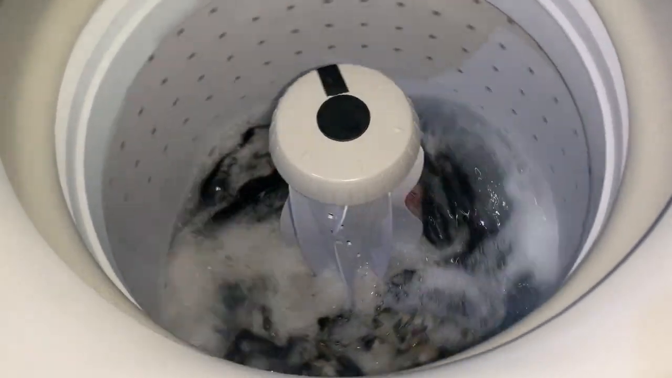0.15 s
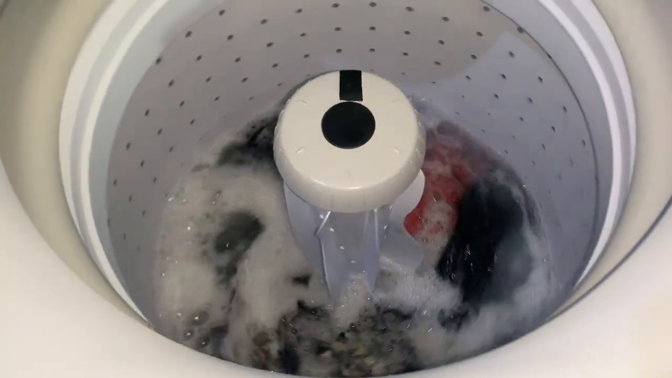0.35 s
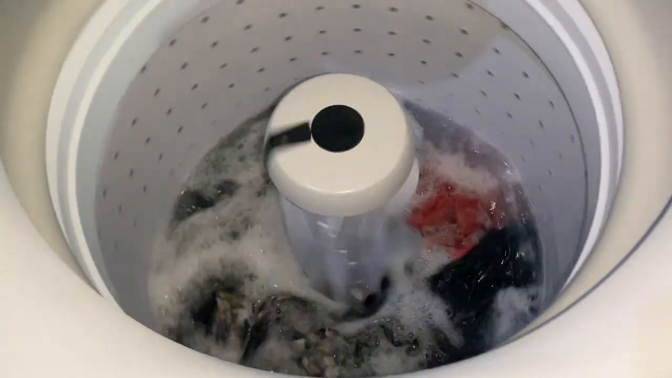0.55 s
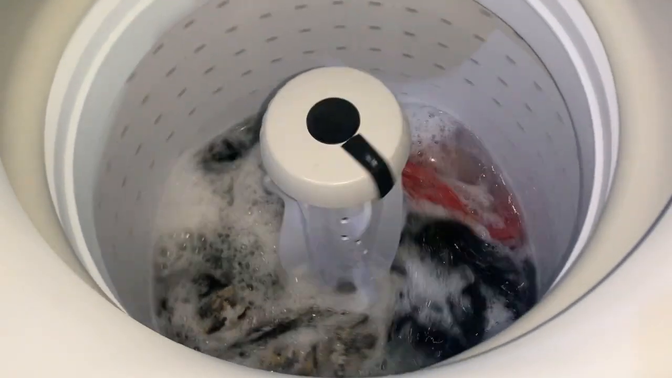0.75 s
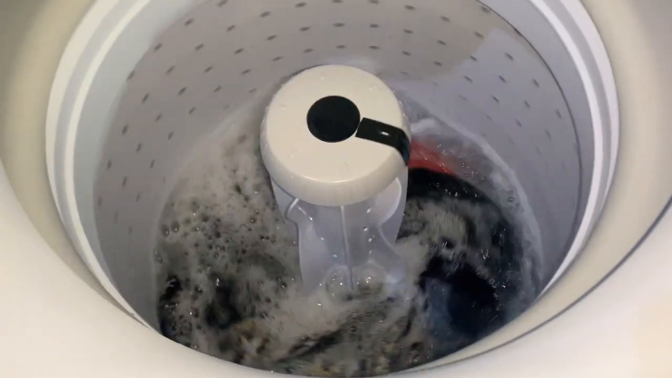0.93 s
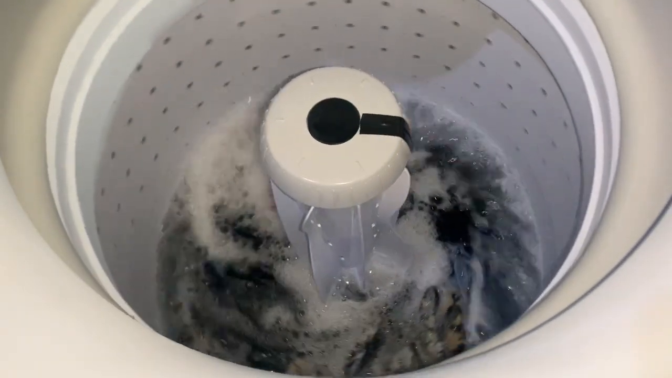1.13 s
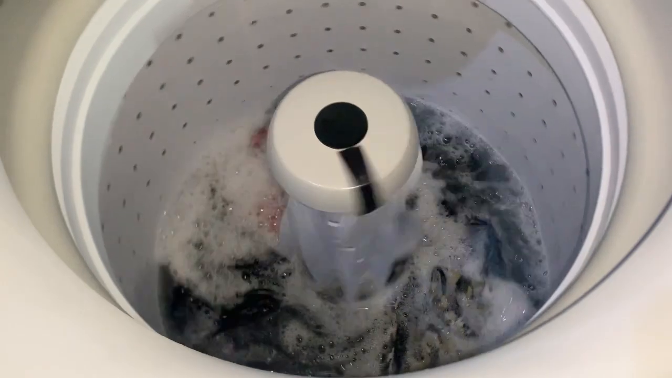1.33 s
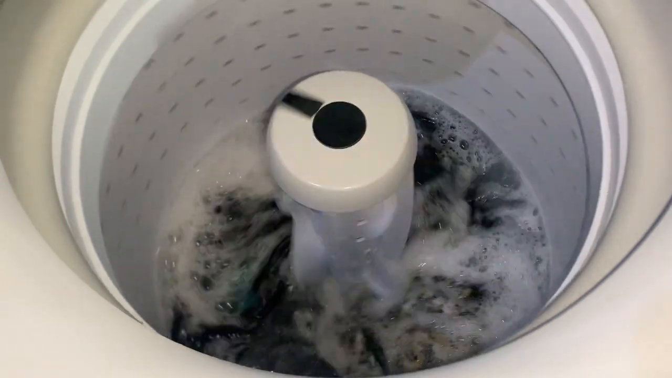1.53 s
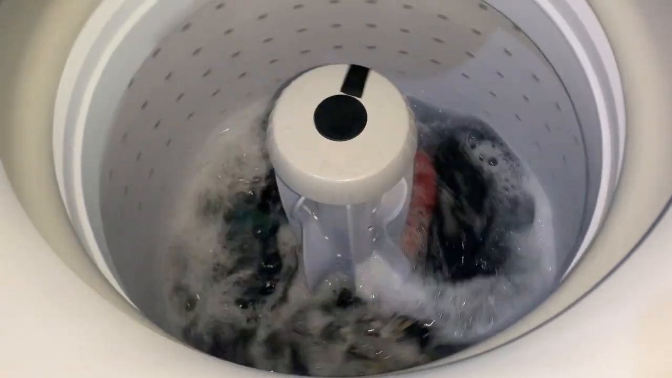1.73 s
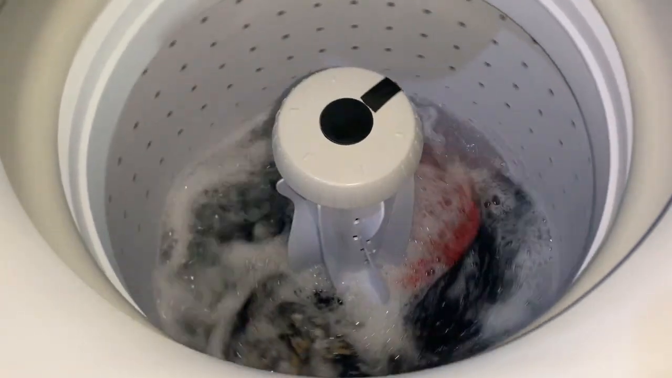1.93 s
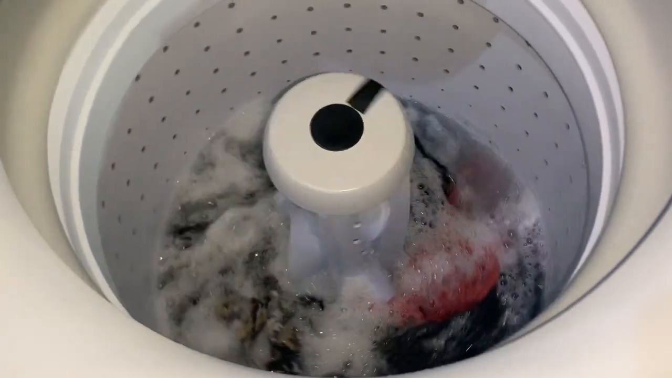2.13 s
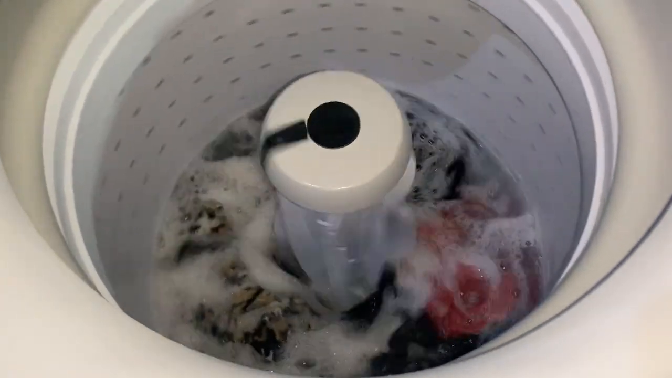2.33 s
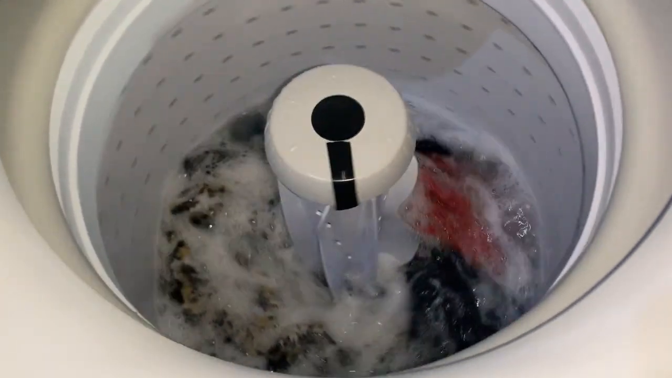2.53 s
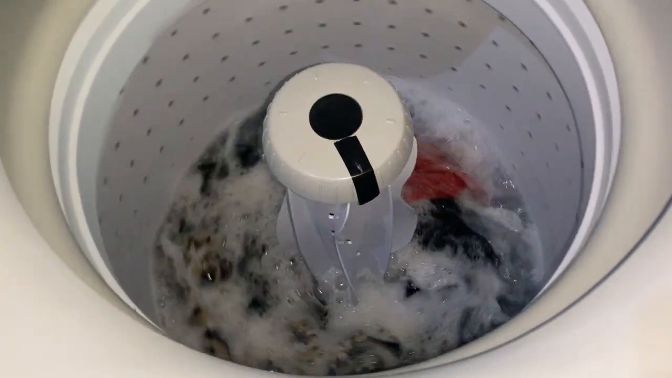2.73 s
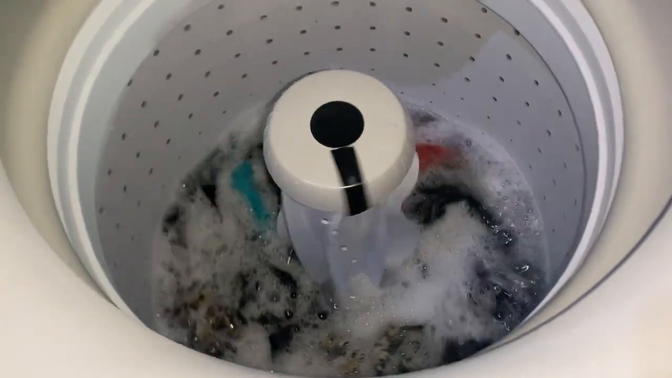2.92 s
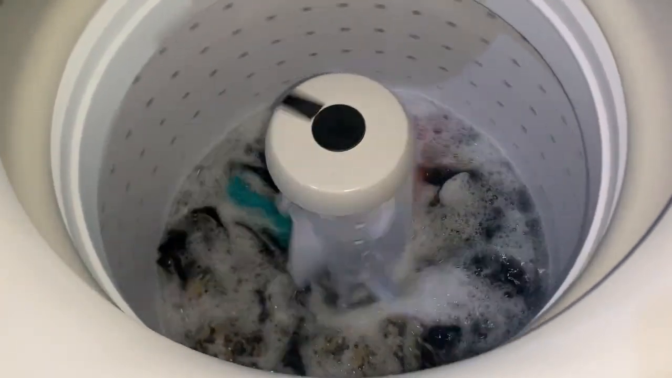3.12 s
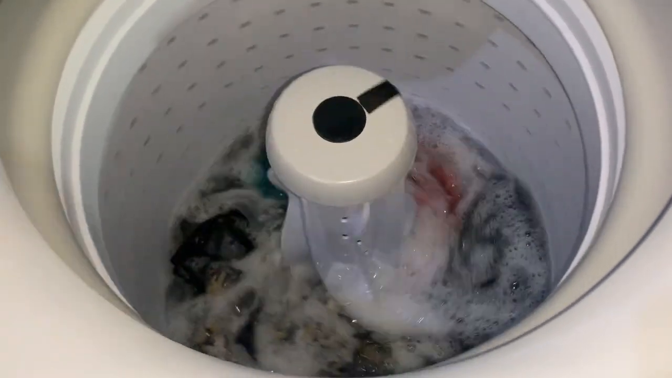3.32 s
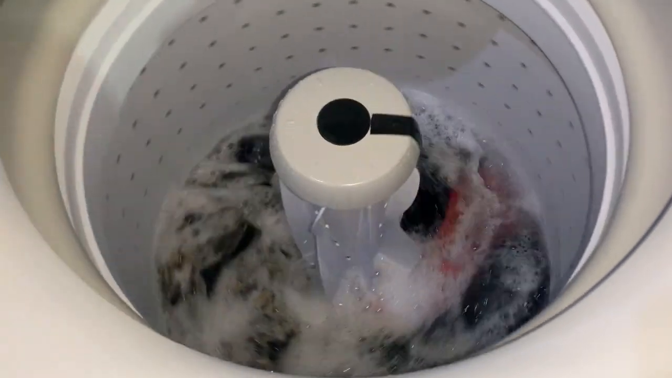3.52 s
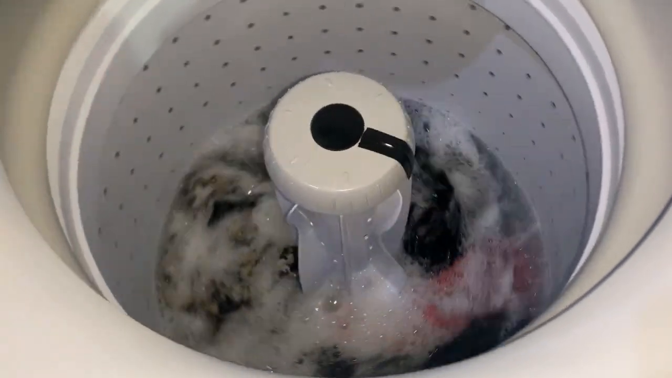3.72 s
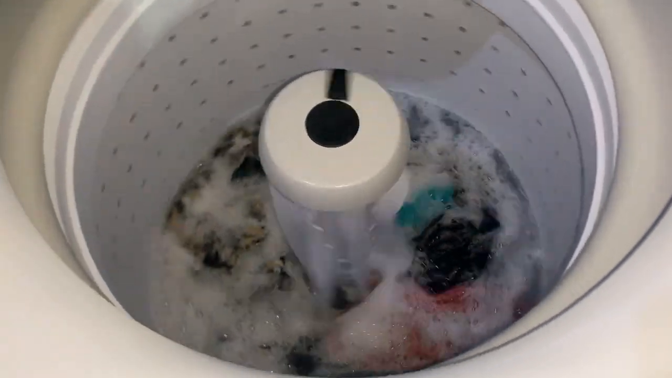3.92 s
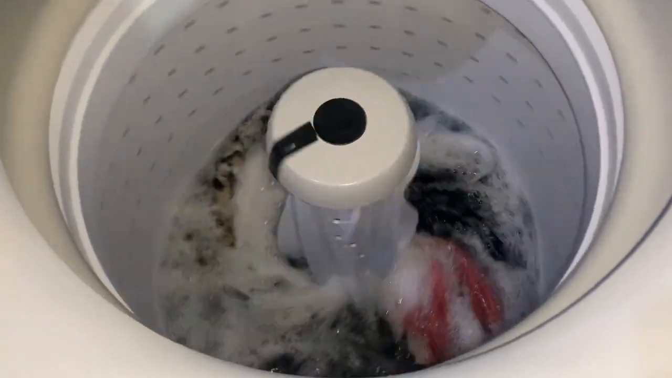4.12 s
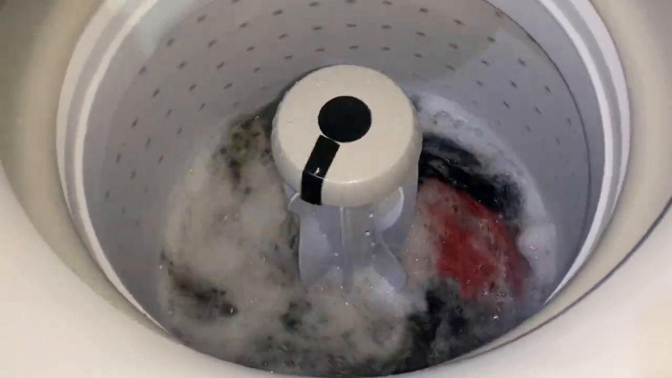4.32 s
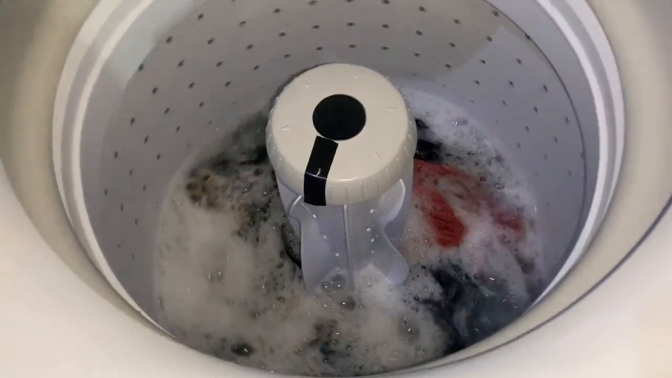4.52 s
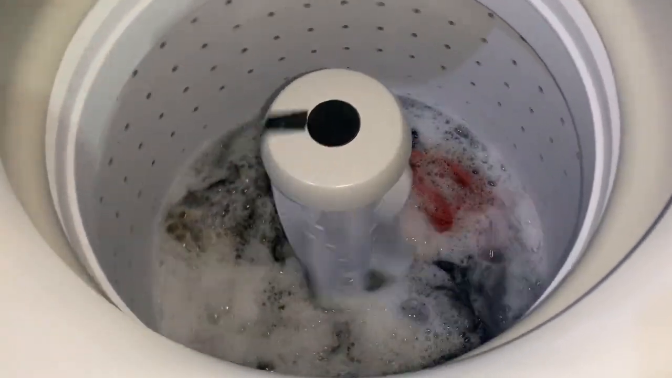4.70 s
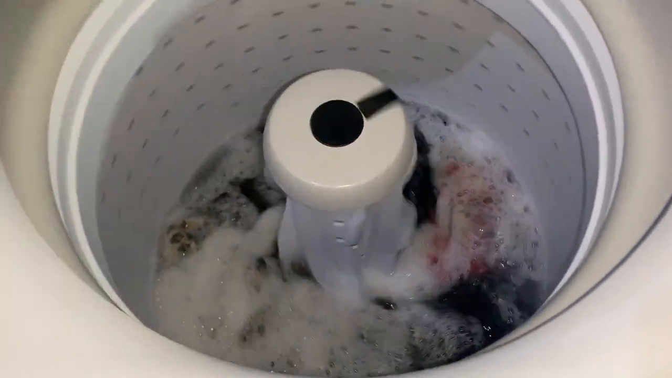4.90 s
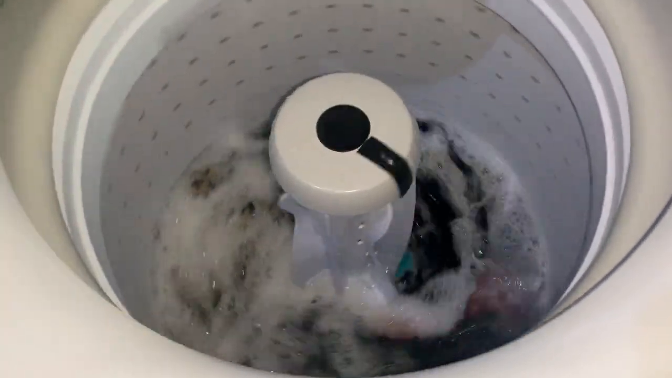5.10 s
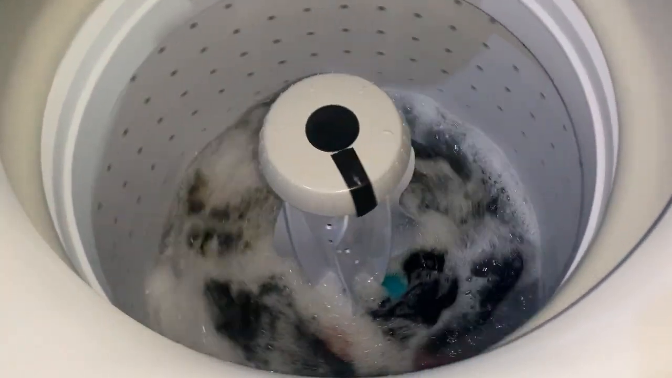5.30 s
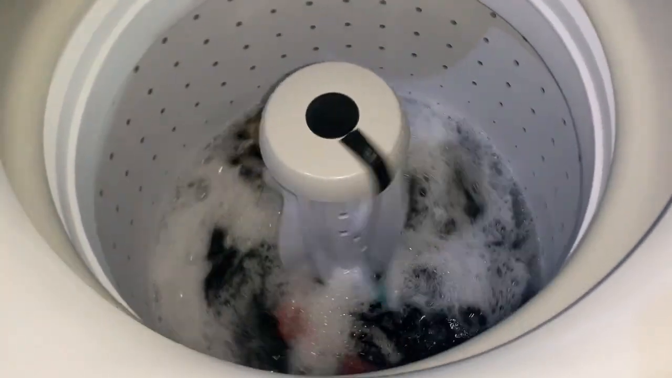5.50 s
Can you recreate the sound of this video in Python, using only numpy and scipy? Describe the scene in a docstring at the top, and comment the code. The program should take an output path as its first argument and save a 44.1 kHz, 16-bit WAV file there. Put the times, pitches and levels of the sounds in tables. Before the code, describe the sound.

Short, throbbing electric hums alternate with sloshing pauses as wet laundry thuds round an open washer tub and suds fizz and gulp.

```python
"""A top-loading washer heard from above its open tub. The motor is switched on for each stroke, turn and turn about:
it buzzes at multiples of twice the mains, throbs with its shaft and shakes the cabinet. Heavy water thuds round the
tub, suds hiss, splashes spit and bubbles gulp; two microphone ports hear the treble one after the other."""
import sys
import numpy as np
from scipy import signal
from scipy.fft import rfft, irfft
from scipy.io import wavfile
from scipy.ndimage import uniform_filter1d

SR = 44100
rng = np.random.default_rng(int(sys.argv[2]) if len(sys.argv) > 2 else 0)


def materialize(psi):
    """Save the field psi as 16-bit PCM at rate SR to the path in sys.argv[1].

    A 1-D psi becomes a single channel; in a 2-D psi each row is a channel.
    """
    bounded = np.clip(np.atleast_2d(psi).T, -1, 1)
    quanta = np.round(bounded * 32767).astype(np.int16)
    wavfile.write(sys.argv[1], SR, quanta)


N = 244755

# motor under current: (on s, off s, cabinet dB, third multiple dB, fourth multiple dB, second multiple in the run-up dB, it joins after s, its dB, cabinet fades after switch-off dB per s,
# sags by dB, upper panels dB, growl dB above the cabinet)
STROKES = [(-0.47, -0.032, -42.5, -22, -31, -45, .17, -33, 105, 2.5, 0, 0), (0.371, 0.786, -32, -41, -36, -44, 0.16, -35.5, 112, -6.5, 2, 0.5), (1.186, 1.629, -30.5, -45.5, -33.5, -46.5, 0.14, -28.5, 90, -5, -1, 4),
           (2.052, 2.42, -32, -40, -36.5, -41.5, 0.16, -36.5, 85, -4.5, 1, -3), (2.865, 3.28, -30.5, -42.5, -31.5, -48, 0.17, -27, 108, -7.5, 0.5, 2.5), (3.735, 4.12, -32, -39.5, -38.5, -40, 0.193, -37, 106, -3, 0.5, -2.5),
           (4.551, 4.951, -30, -46.5, -36, -48, 0.16, -32.5, 110, -3.5, 1, -0.5), (5.413, 5.80, -32, -41, -30.5, -57, 0.033, -39, 100, -4, 1, 3)]
TWICE_MAINS_HZ = 119.9  # fixed
# other multiples of the buzz, turning one way and the other: (multiple of twice the mains, dB above the cabinet at switch-on, swollen, midway, at switch-off)
WINDING = [[(1, -4, -5.5, -7.5, 1), (5, -5.5, -11, -3, -7.5), (6, -5, -13.5, -5.5, -11)], [(1, 1, 0, -1.5, 1), (5, -15.5, -10, -19.5, -16), (6, -10.5, -8.5, -8.5, -4)]]
CABINET = [(150, -5.5), (250, 2), (285, -8), (355, 0.5), (424, -16), (473, -2.5), (548, -0.5), (583, -3), (697, -6),
           (771, -8.5), (1170, -22.5), (1280, -75.5), (1600, -30), (2080, -64), (3520, -120)]  # (Hz, dB)
CABINET_ALIKE = 0.67
TUB = [(86, 120, -38.5), (111, 6.6, 1.5), (143.8, 27, -3), (200, 250, -7.5)]  # (Hz, width Hz, dB)
WASH = [(900, 8), (1400, -2), (2000, 1), (3000, -4), (4000, -8), (5500, -12), (7500, -22.5)]  # (Hz, dB)
WASH_RIGHT_DB = [(1000, -1.5), (2500, -0.5), (4400, 0), (5800, 4.5), (7000, 5)]  # (Hz, right over left dB)
SPRAY = [[(5000, -19), (6500, 7), (8000, 3.5), (9500, -2)], [(9500, 3.5), (11000, 1), (14000, 2), (16000, 1)]]  # low and high: (Hz, dB)
# splashes: (s, peak dB, wash band dB above it, top octave dB above it, t60 s)
SPLASHES = [(0.1526, -55, 4, -6, 0.061), (0.17, -37, -16, -2.5, 0.032), (0.3007, -60, -10, -9, 0.04),
            (0.709, -31, 11, -13, 0.052), (0.784, -39, 6, -5, 0.025), (0.9108, -31.5, -15, -13, 0.018),
            (0.956, -45, -13, -11, 0.16), (1.1258, -53, -4, -28, 0.41), (1.3887, -51, -8, -20, 0.052),
            (1.428, -40.5, 9, -8, 0.062), (1.4915, -35, 6, -29, 0.034), (1.567, -44, 3, -13, 0.12),
            (1.7478, -27, -6, -16, 0.049), (1.762, -45, -5, -11, 0.09), (1.8602, -47, -14.5, -2, 0.04), (1.8821, -50.5, 9, -1, 0.021),
            (1.9205, -45, -23, -3, 0.13), (2.2807, -33, -2, -8, 0.019), (2.3075, -37, 2, -9, 0.065),
            (2.3416, -31, -16, -5, 0.025), (2.3905, -38, -13, -16, 0.049), (2.4124, -35, -16, -11, 0.067),
            (2.5085, -50, 14, -26, 0.068), (2.5306, -46, 8, -6, 0.044), (2.582, -47, -19, 5, 0.02),
            (3.008, -41.5, -3, -35, 0.057), (3.0505, -39, 9, -25, 0.024), (3.0679, -48, -9, 1, 0.031),
            (3.138, -42, -13, -1, 0.027), (3.1782, -50, 4, -12, 0.076), (3.263, -32, -12, -4, 0.019),
            (3.463, -36, -4, -20, 0.05), (3.932, -44.5, 12, -2, 0.13), (3.9785, -36, -16, -1, 0.047),
            (4.008, -32.5, 1, 1, 0.026), (4.048, -32, -13, -9, 0.025), (4.1004, -46, 1, 1, 0.037),
            (4.15, -33, -20, -6, 0.018), (4.1944, -51, 15, -31, 0.034), (4.2303, -46, 12, -12, 0.04),
            (4.2398, -38.5, 5.5, -13, 0.11), (4.781, -50, -4, -21, 0.16), (4.891, -32.5, -16, -9, 0.026),
            (4.935, -47.5, 1, -6, 0.14), (5.03, -55, 0, -4, 0.025), (5.0524, -45, 2, -22, 0.027),
            (5.1192, -42.5, -2, -4.5, 0.066), (5.1971, -48, -6.5, -21, 0.029), (5.219, -55, -6, -6, 0.035),
            (5.259, -35.5, -10, -21, 0.047), (5.3148, -59.5, 11, -8, 0.18)]
RUMBLE_DB = -63
TOP_HZ = 15900  # fixed
T = np.arange(N) / SR
SIDES = np.array([[1], [-1]])
# the rotor growls until it is up to speed: (multiple of twice the mains, dB)
GROWL = [(3.5, -7.5), (4.5, -10.5), (5.5, -10), (6.5, -12), (7.5, -11.5), (8.5, -19.5), (9.5, -27)]
RUN_UP_S, SHAFT_HZ = 0.1015, 26.96
PANELS = [(450, 40, 7), (513, 65, -6), (683, 65, 2.5), (919, 175, 6.5), (1049, 41, 9), (1177, 21, 13)]  # (Hz, width Hz, dB)
# wet cloth thuds on the tub: (s, peak dB, Hz, cycles)
THUDS = [(.015, -30, 147, 7.5), (.24, -43, 108, 2.6), (.53, -26, 110, 3.5), (.6, -39, 109, 4.1), (0.678, -21.5, 144.4, 7.4), (0.764, -21.5, 125, 6.3), (0.871, -26, 101, 7.8), (1.377, -26, 121, 4.4),
         (1.56, -24, 221, 14), (1.595, -22.5, 164, 12), (1.658, -21.5, 150, 2.9), (1.75, -34, 106, 5), (1.863, -32.5, 111, 3.1), (2.238, -27, 154, 7.1),
         (2.317, -17.5, 134, 6.1), (2.438, -35, 212, 3.1), (3.04, -24.5, 127, 5.2), (3.22, -21, 114, 6.6), (3.267, -17, 100.6, 4.3), (3.348, -20.5, 112.2, 10),
         (3.77, -29, 127, 7.1), (3.95, -18.5, 149.2, 12), (3.995, -18, 141, 5.2), (4.119, -19.5, 176, 2.9), (4.263, -32, 169, 1.3), (4.669, -25.5, 204, 9.2),
         (4.93, -23, 200, 16.3), (4.97, -29, 162, 11), (5.0, -31, 118, 4.7), (5.078, -32, 111, 6.1)]
PORT_LAG_S, PORT_TURN = 9 / 44100, 1.48  # fixed
# clear bubbles and droplets: (s, peak dB, Hz, cycles)
BUBBLES = [(.075, -40, 670, 5.4), (.101, -37.5, 1950, 12), (.105, -40, 1360, 9), (.117, -41, 770, 6), (.119, -44, 1830, 16),
           (.137, -45, 1800, 19), (.153, -45, 2200, 11), (.165, -37, 2050, 11), (.166, -41, 1480, 5.7), (.179, -41, 890, 7.1),
           (.698, -39, 1600, 36), (.710, -48, 3000, 16), (.768, -35, 1150, 16), (.774, -41, 3350, 14), (.776, -35.5, 1830, 8.8),
           (.863, -26.5, 537, 10), (1.006, -43.5, 1075, 13), (1.106, -45, 840, 8), (1.567, -43, 2660, 14), (1.645, -39, 2430, 11),
           (1.667, -27, 560, 7.4), (1.829, -43, 1170, 10), (2.388, -38, 1790, 26), (2.433, -42, 5900, 18), (2.440, -34, 5570, 18), (2.442, -37, 6000, 12), (2.318, -39, 2040, 16), (2.405, -43, 1860, 24), (2.425, -40, 1700, 14), (2.455, -40, 2080, 26),
           (2.478, -54, 3100, 27), (2.535, -44, 1680, 20),
           (2.510, -43, 6350, 39), (2.512, -38, 1730, 12), (2.550, -42.5, 1780, 17), (2.734, -38, 675, 8.2), (3.480, -41.5, 735, 5.9),
           (3.935, -38, 2200, 12), (4.243, -49, 2450, 11), (4.350, -49, 1120, 8), (4.482, -42.5, 1830, 3.9), (4.812, -38, 2390, 19),
           (4.826, -45, 5800, 20), (4.865, -44, 3000, 14), (4.96, -46, 4520, 20), (4.965, -33.5, 1180, 17), (5.032, -41.5, 1790, 8), (5.119, -45.5, 1900, 36), (5.085, -54, 2900, 14), (5.142, -47, 2180, 9.1), (5.196, -45.5, 6240, 33), (5.247, -47, 1780, 14), (5.260, -38, 1080, 7)]
# where each multiple of the buzz sits: (left over right dB, left leads radians)
WINDING_PLACE = [(-1, 0.083), (0.5, 0.42), (0.5, -0.17), (4.5, -0.94), (-2, 0.29), (-3.5, 0.29)]
HOLLOW = [(1480, 21, -6), (1766, 22, 4.5), (2080, 17, -13), (2480, 210, -11.5), (3000, 67, -9.5), (4320, 840, -2.5)]  # air in the tub: (Hz, width Hz, dB)
# a faint whine as some strokes gather speed: (s, peak dB, Hz, cycles)
WHINES = [(3.08, -36, 1190, 81), (3.81, -48, 2420, 130), (4.64, -46, 2310, 85), (4.675, -39.5, 2310, 79), (4.742, -41, 2330, 51)]
START_DB, SWELL_S, CUT_DB, CUT_S = -8, 0.063, -6, 0.03  # cabinet: jumps in, swells, drops at switch-off
IDLE_DB, EDGE_S = -59, 0.0033
FOURTH_START_DB, FOURTH_SAG_DB = -19.5, -4
BRIGHT_IDLE_DB, BRIGHT_START_DB = -2, -2  # upper panels
# the cabinet is jolted between strokes: (s, dB)
JOLTS = [(.02, -56.5), (0.125, -44), (0.871, -36.5), (2.74, -57.5), (4.252, -42.5), (5.27, -54)]
JOLT_RISE_DB_S, JOLT_FADE_DB_S = 600, 250
# each stroke whips up the suds: (from s, to s, wash dB, climbs by dB, its upper part dB above it, spray dB above it, dies away dB per s)
SWELLS = [(-.2, -0.027, -57, -1.5, -2.5, -22, 95), (0.522, 0.736, -51, 2.5, -2, -9.5, 96), (1.336, 1.63, -52.5, 3.5, -6, -17, 134),
          (2.189, 2.436, -49, 3.5, -5, -13.5, 103), (3.03, 3.242, -52, 3, -6, -17, 99), (3.89, 4.138, -51.5, 1.5, -5, -11, 105),
          (4.724, 4.958, -52, 3.5, -5, -14.5, 98), (5.561, 5.8, -49.5, 5, -7, -13, 100)]
# suds trickling in the pauses: (s, wash dB, its upper part dB above it, spray dB above it)
TRICKLE = [(.1, -59.5, 2, -14), (.35, -59.5, -2, -24), (.88, -58.5, -8, -24), (.97, -59.5, 10, -9), (1.1, -63.5, 0.5, -20), (1.18, -61, 5.5, -19), (1.72, -61.5, -4, -27), (1.82, -55, -0.5, -15), (2.0, -60.5, 3, -18),
           (2.7, -63.5, 5.5, -12.5), (2.9, -62.5, -4, -28), (3.4, -60.5, 2, -15), (3.72, -63.5, -6.5, -20), (4.27, -62.5, 2, -22.5), (4.5, -62.5, -12.5, -27), (5.15, -62, 3, -15), (5.45, -61.5, -7.5, -22)]
SPLASH_UNDER_DB, SPLASH_WASH_DB = -11, -13.5
SECOND_JOIN_S = 0.0096
SECOND_SAG_DB, SECOND_FLAT_HZ, SECOND_SETTLE_S = 1.5, 11.7, 0.044  # joins flat, settles, then holds its level
LOW_PANEL_LATE_DB = -21  # the lowest panel wakes late too
# and heaves the water round the tub: (from s, to s, dB, climbs by dB, dies away dB per s)
HEAVES = [(-.2, 0.0, -35, 0, 123), (0.49, 0.884, -40.5, 3.5, 170), (1.325, 1.725, -39, -1, 171), (2.207, 2.463, -44.5, 12, 107), (3.016, 3.382, -39, 3.5, 130),
          (3.81, 4.28, -42, 4, 174), (4.61, 5.08, -42, 6, 150), (5.457, 5.9, -43.5, 3, 106)]
WASH_RISE_DB_S, HEAVE_RISE_DB_S, HEAVE_CALM_DB = 126.5, 108, -55.5
SPLASH_BODY_DB = -19
SPLASH_BODY = [(2500, -5), (4500, -0.5), (6500, 0)]  # (Hz, dB)
TOP_PANEL_LATE_DB = -5  # the highest panels wake only as the rotor gains speed
THIRD = [(-3.5, 3.5, -3.6, 8), (5, -3.5, -1.8, -0.5)]  # third multiple, each way: (at switch-on, swollen, midway, at switch-off dB) above its level
MIDWAY = 0.46  # share of the stroke
SPRAY_LATE_DB_S, MIST_DB = 51, -91.5  # spray lags the wash; a faint steady mist


def undb(db):
    return 10 ** (np.asarray(db) / 20)


def unit(x):
    return x / np.sqrt(np.mean(x ** 2))


def curves(rows):
    """Each column of (s, value, ..) rows, joined by straight lines in time."""
    s, *columns = np.transpose(rows)
    return [np.interp(T, s, c) for c in columns]


def colour(x, points):
    """Filter by (Hz, dB) points, falling away steeply outside them."""
    hz, db = np.transpose(points)
    f = np.log(np.fft.rfftfreq(2 ** 18, 1 / SR) + 1)
    outside = np.maximum(np.log(hz[0]) - f, 0) + np.maximum(f - np.log(hz[-1]), 0)
    return irfft(rfft(x, 2 ** 18) * undb(np.interp(f, np.log(hz), db) - 50 * outside))[..., :N]


def walk(rate, size=N):
    """Random levels held 1 / rate s and slewed twice; spread near 1."""
    k = int(SR / rate)
    return 1.184 * uniform_filter1d(uniform_filter1d(np.repeat(rng.standard_normal(size // k + 1), k), k), k)[:size]


def pair(alike):
    """Left and right noise that share a part."""
    alike = np.clip(alike, 0, 1)
    mid, side = rng.standard_normal((2, N))
    return np.sqrt((1 + alike) / 2) * mid + np.sqrt((1 - alike) / 2) * side * SIDES


def crackle(rate, spread_db, t60):
    """Gain that leaps at random drops of very uneven size and dies away after each."""
    drops = (rng.random(N) < rate / SR) * undb(spread_db * rng.exponential(size=N))
    return signal.lfilter([1], [1, -np.exp(-np.log(1000) / (t60 * SR))], drops)


def add(into, s, sound):
    i = int(s * SR)
    into[..., i:i + sound.shape[-1]] += sound[..., :N - i]


def motor():
    """Clean lines while current flows, throbbing once a shaft turn, over the rattle of the cabinet panels."""
    cabinet_db = cabinet()
    bright_db = np.full(N, 1. * BRIGHT_IDLE_DB)
    lines, live, slow = np.zeros((2, N)), np.zeros(N), np.zeros(N)
    for n, (on, off, _, third_db, fourth_db, early_db, join, second_db, _, _, upper_db, growl_db) in enumerate(STROKES):
        if off < 0:
            continue
        span = slice(int(on * SR), min(int(off * SR), N))
        t = np.maximum(T[span] - on, 0)
        gate = np.clip(t / 0.0033, 0, 1) * np.clip((off - on - t) / 0.11, 0, 1)
        live[span] = gate
        slip = np.exp(-t / RUN_UP_S)
        bright_db[span] = upper_db + BRIGHT_START_DB * slip
        slow[span] = slip
        turns = SHAFT_HZ * (t - RUN_UP_S * (1 - slip))
        second = np.interp(t, [join - SECOND_JOIN_S, join, join + 0.072, off - on], [early_db, second_db, second_db + 1.5, second_db + SECOND_SAG_DB])
        stages = [0, SWELL_S, MIDWAY * (off - on), off - on]
        third = third_db + np.interp(t, stages, THIRD[n % 2])
        fourth = fourth_db + np.interp(t, [0, SWELL_S, off - on], [FOURTH_START_DB, 0, FOURTH_SAG_DB])
        levels = [(2, second), (3, third), (4, fourth)] + [(k, cabinet_db[span] + np.interp(t, stages, dbs)) for k, *dbs in WINDING[n % 2]]
        levels += [(k, cabinet_db[span] + db + growl_db) for k, db in GROWL]
        for k, db in levels:
            start, lag, turn = rng.random(3) * 2 * np.pi
            gain = undb(db + (2.4 if k in (2, 4) else 3.2) * walk(15.7, size=len(t)) + bright_db[span] * (k > 5))
            # the growl fades and the lowest line grows as the rotor gains speed
            gain = gain * (slip if k % 1 else (1 - slip) ** 2 if k == 1 else 1)
            throb = 1 + (.3 if k in (2, 4) else .7) * np.cos(2 * np.pi * turns + turn)
            phase = 2 * np.pi * k * TWICE_MAINS_HZ * t + start + 0.25 * k * walk(15.26, size=len(t))
            if k == 2:
                phase += 2 * np.pi * SECOND_FLAT_HZ * SECOND_SETTLE_S * np.exp(-np.maximum(t - join, 0) / SECOND_SETTLE_S)
            left_db, lead = (0, 0.23 * np.sin(lag)) if k % 1 else WINDING_PLACE[int(k) - 1]
            lines[:, span] += gate * gain * throb * undb(left_db / 2 * SIDES) * np.sin(phase + lead / 2 * SIDES)
    shake = colour(pair(CABINET_ALIKE) * undb(3.47 * walk(25)), CABINET)
    rings = sum(undb(db) * signal.lfilter(*signal.iirpeak(hz, hz / width, SR), shake) for hz, width, db in PANELS)
    rattle = unit(shake + rings)
    upper = colour(rattle, [(630, 0), (2000, 0)])
    rattle = rattle + (undb(bright_db) - 1) * upper + (undb(TOP_PANEL_LATE_DB * slow) - 1) * colour(rattle, [(950, 0), (2000, 0)])
    rattle = rattle + (undb(LOW_PANEL_LATE_DB * slow) - 1) * colour(rattle, [(100, 0.0024), (280, 0.0029)])
    return lines + rattle * undb(cabinet_db - 2.25 * live + 0.55 * SIDES)


def heave():
    """Heavy water rings the low resonances of the tub; wet cloth thuds against it."""
    push = pair(0.98) * undb(2.6 * walk(30))
    rings = sum(undb(db) * signal.lfilter(*signal.iirpeak(hz, hz / width, SR), push) for hz, width, db in TUB)
    rings = signal.sosfilt(signal.butter(2, [60, 230], "bandpass", fs=SR, output="sos"), rings)
    level_db = blend(HEAVE_CALM_DB, *(plateau(*row, HEAVE_RISE_DB_S) for row in HEAVES))
    return unit(rings) * undb(level_db) + notes(THUDS, glide=-0.012, rise=0.27, spread_db=-0.7)


def water(wash_db, upper_db, spray_db):
    """Lumpy wash scattered round the tub, and fine spray from one spot that reaches the right port first."""
    wash = undb(wash_db) * (1 + 0.18 * crackle(110, 3.25, 0.039))
    spray = np.array([undb(wash_db + spray_db + 6.0 * walk(20)) * (1 + .5 * crackle(70, 4.9, 0.0075)) + undb(MIST_DB) for _ in SPRAY])
    t, body = T[:SR // 5], np.zeros(N)
    for s, db, wash_rel_db, top_rel_db, t60 in SPLASHES:
        burst = np.minimum(t / 0.0028, 1) * (undb(-60 * t / t60 * 2.14) + 0.47 * undb(-60 * t / t60))  # a slap, then its hiss
        # what the top octave lacks sits just under it
        under = np.sqrt(np.clip(1 - undb(2 * top_rel_db), .05, 1))
        add(spray[0], s, undb(db + SPLASH_UNDER_DB) * under * burst)
        add(spray[1], s, undb(db + top_rel_db) * burst)
        add(body, s, undb(db + SPLASH_BODY_DB) * burst)
        add(wash, s, undb(db + wash_rel_db + SPLASH_WASH_DB) * burst)
    # each third of an octave swells and sinks on its own; the higher ones follow the brightness of the churn
    lumps = sum(undb(2.13 * walk(18) + 2.16 * walk(70) + upper_db * np.clip(np.log2(hz / 1800), -.3, 1)) * signal.sosfilt(signal.butter(2, [hz / 1.152, hz * 1.127], "bandpass", fs=SR, output="sos"), pair(0.012)) for hz in 900 * 1.26 ** np.arange(11))
    hollow = sum(undb(db) * signal.lfilter(*signal.iirpeak(hz, hz / width, SR), lumps) for hz, width, db in HOLLOW)
    left, right = unit(colour(lumps + hollow, WASH)) * wash
    right = colour(right, [(20, 0.014)] + WASH_RIGHT_DB + [(20000, 0.0091)])
    fine = sum(share * unit(colour(rng.standard_normal(N), band)) * gain for share, band, gain in zip((.55, .8), SPRAY, spray))
    hz = np.fft.rfftfreq(2 ** 18, 1 / SR)
    late = irfft(rfft(fine, 2 ** 18) * np.exp(1j * (PORT_TURN - 2 * np.pi * hz * PORT_LAG_S)))[:N]
    # some of the spray is scattered by the tub wall and differs between the ports
    scatter = 0.16 * unit(colour(pair(0), [(6500, -1.0), (16000, -8.0)])) * spray.mean(axis=0)
    return np.array([left + late, right + fine]) + scatter + body * unit(colour(pair(0.24), SPLASH_BODY))


def bubbles(wash_db):
    """Short rising notes: the clear ones near the middle, and a wide patter of small ones that swells with the wash."""
    small = [(N / SR * a, wash_db[int(a * N)] - 8.0 + 18 * b ** 3 - 7 * c, 900 * 7 ** c, 6 + 22 * d) for a, b, c, d in rng.random((800, 4))]
    clear = notes(BUBBLES, glide=.03, rise=.12, spread_db=.3)  # fixed
    return clear + notes(small, glide=0.027, rise=0.13, spread_db=4.5)


def notes(rows, glide, rise, spread_db):
    """Damped notes (s, peak dB, Hz, cycles) that slide in pitch, each at its own place between left and right."""
    out = np.zeros((2, N))
    for (s, db, hz, cycles), place in zip(rows, rng.uniform(-1.2, 1, len(rows))):
        u = np.arange(int(3 * cycles / hz * SR)) * hz / SR / cycles
        note = np.sin(2 * np.pi * cycles * (u + glide * u ** 2)) * np.minimum(u / rise, 1) * np.exp(-2.3 * u)
        add(out[0], s + spread_db / 7000 * (1 + place), undb(db - spread_db * place) * note)
        add(out[1], s + spread_db / 7000 * (1 - place), undb(db + spread_db * place) * note)
    return out


def plateau(start, stop, db, climb_db, fall_db_s, rise_db_s):
    """Level in dB that rises to a sloping plateau and slides off it."""
    return db + np.interp(T, [start, stop], [0, climb_db]) - rise_db_s * np.maximum(start - T, 0) - fall_db_s * np.maximum(T - stop, 0)


def blend(*dbs):
    """Level of several levels heard together."""
    return 10 * np.log10(sum(undb(db) ** 2 for db in dbs))


def cabinet():
    """Level of the cabinet: a jump, swell, sag and fade for each stroke, jolts and an idle murmur."""
    strokes = [db + np.interp(T, [on - EDGE_S, on, on + SWELL_S, off, off + CUT_S, off + CUT_S + 1],
                              [-80, START_DB, 0, sag, sag + CUT_DB, sag + CUT_DB - fade])
               for on, off, db, *_, fade, sag, _, _ in STROKES]
    jolts = [plateau(s, s, db, 0, JOLT_FADE_DB_S, JOLT_RISE_DB_S) for s, db in JOLTS]
    return blend(IDLE_DB, *strokes, *jolts)


def suds():
    """Wash level, brightness and spray share: the swells over the trickle, each in proportion to its power."""
    parts = [curves(TRICKLE)] + [(plateau(start, stop, db, climb_db, fall, WASH_RISE_DB_S), upper, spray - SPRAY_LATE_DB_S * np.clip(start + 0.044 - T, 0, .2)) for start, stop, db, climb_db, upper, spray, fall in SWELLS]
    wash_db = blend(*(p[0] for p in parts))
    return wash_db, *(sum(undb(p[0] - wash_db) ** 2 * p[k] for p in parts) for k in (1, 2))


def scene():
    """Motor, water and the rumble of the floor."""
    rumble = unit(colour(pair(0.8), [(25, -12), (40, -14.0), (55, 5)])) * undb(RUMBLE_DB)
    whines = notes(WHINES, glide=0.0079, rise=0.73, spread_db=.5) * undb(2.8 * walk(90))
    churn = suds()
    return motor() + whines + heave() + water(*churn) + bubbles(churn[0]) + rumble


def record(dry):
    """The recorder cuts the top."""
    return signal.sosfilt(signal.ellip(10, .2, 70, TOP_HZ, fs=SR, output="sos"), dry)


dry = scene()
out = record(dry)
materialize(out)
```